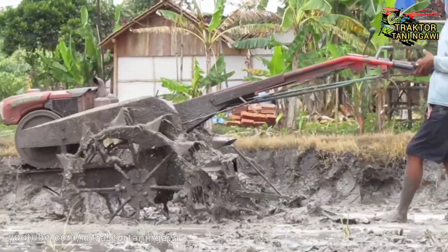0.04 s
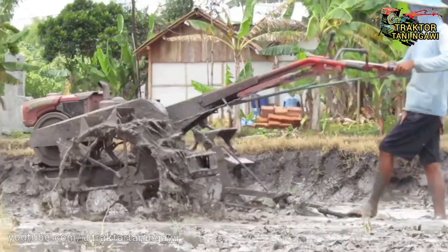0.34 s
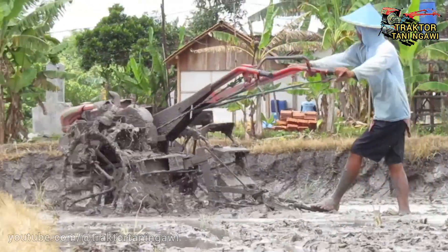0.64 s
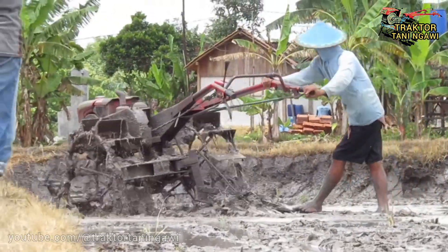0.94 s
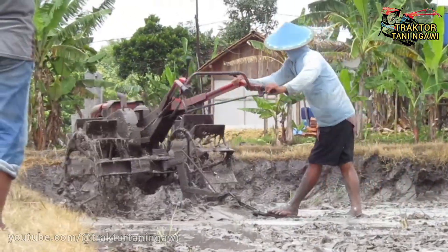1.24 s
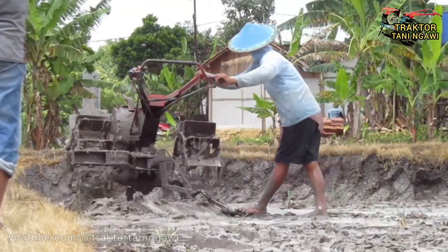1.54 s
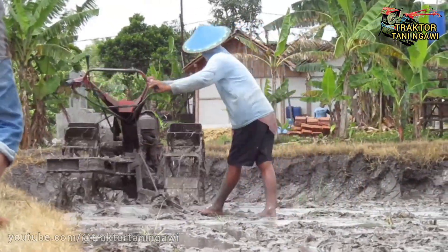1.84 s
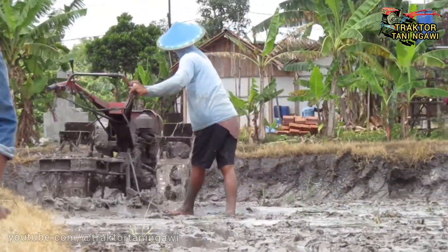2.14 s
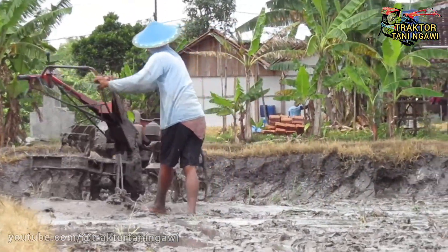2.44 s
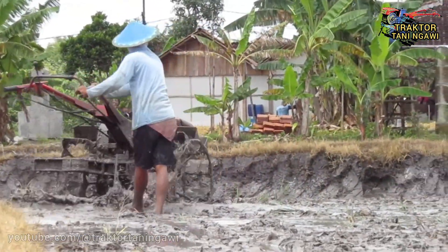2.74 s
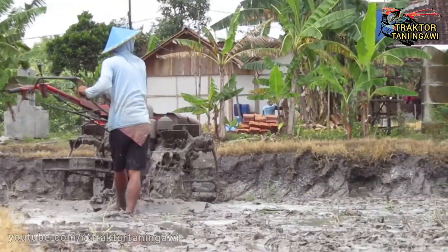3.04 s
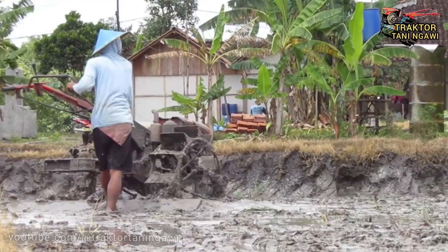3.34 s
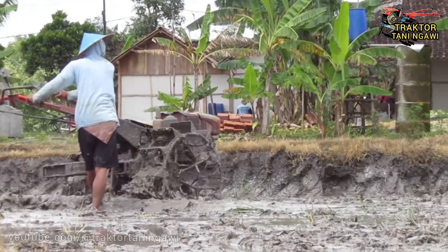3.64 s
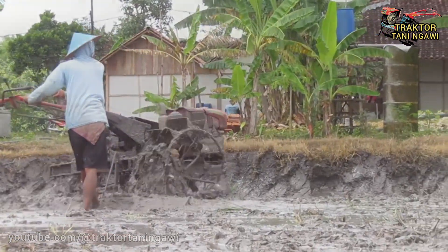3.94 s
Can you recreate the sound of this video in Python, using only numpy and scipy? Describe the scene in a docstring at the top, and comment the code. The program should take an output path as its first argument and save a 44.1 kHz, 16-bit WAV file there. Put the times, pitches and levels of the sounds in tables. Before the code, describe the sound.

A walking tractor's diesel engine chugs steadily, with faint mud splatter and wind.

```python
"""A single-cylinder diesel walking tractor turns round in a flooded field, a few metres from the mic.
Every cycle knocks in the block, spits from the exhaust and thumps in the pipes; the exhaust
swings away from the microphone and the bare engine comes round to face it.
Mud patters off the cage wheels, a loose part clanks and wind buffets the microphone."""
import sys
import numpy as np
from scipy import signal
from scipy.fft import rfft, irfft
from scipy.io import wavfile
from scipy.ndimage import uniform_filter1d

SR = 44100
rng = np.random.default_rng(int(sys.argv[2]) if len(sys.argv) > 2 else 0)


def waveform_to_disk(signal):
    """Save audio, clipped to [-1, 1], as 16-bit WAV at the path in sys.argv[1]."""
    frames = np.transpose(np.atleast_2d(signal))
    scaled = np.clip(frames, -1, 1) * 32767
    samples = np.round(scaled).astype(np.int16)
    wavfile.write(sys.argv[1], SR, samples)


N = 176400
TIME = np.arange(N) / SR
AGE = np.arange(SR // 5) / SR  # seconds since a firing


def undb(db):
    """Decibels to gain."""
    return 10 ** (np.asarray(db) / 20)


def curve(rows):
    """A table of (time, value) joined by straight lines."""
    return np.interp(TIME, *np.array(rows).T)


def unit(x):
    """Scale to rms 1."""
    return x / np.sqrt(np.mean(x ** 2) + 1e-18)


def colour(x, spectrum):
    """Causal filter through (Hz, dB) points; rms 1 out."""
    size = 2 * N
    hz, db = np.array(spectrum).T
    gain = undb(np.interp(np.log(np.fft.rfftfreq(size, 1 / SR) + 1), np.log(hz), db))
    cepstrum = irfft(np.log(gain))
    cepstrum[1:N] *= 2  # fold to minimum phase
    cepstrum[N + 1:] = 0
    return unit(irfft(rfft(x, size) * np.exp(rfft(cepstrum)))[:N])


def flicker(rate_hz):
    """Smooth random wandering with rms 1."""
    hold = max(int(SR / rate_hz), 1)
    steps = np.repeat(rng.standard_normal(N // hold + 1), hold)
    return unit(uniform_filter1d(steps, hold)[:N])


def burst(age, rise_s, decay_s):
    """Envelope: a straight rise, then an exponential fall."""
    return np.clip(age / rise_s, 0, 1) * np.exp(-np.maximum(age - rise_s, 0) / decay_s)


def ring(age, hz, decay_s):
    """A damped resonance struck at age 0."""
    age = np.maximum(age, 0)
    return -np.sin(2 * np.pi * hz * age) * np.exp(-age / decay_s)


def pings(times, pitches, levels_db, decay_s):
    """Many short rings, each with its own time, pitch and level."""
    age = np.arange(SR // 20) / SR
    out = np.zeros(N + len(age))
    for at, hz, db in np.broadcast(times, pitches, levels_db):
        if 0 <= at < N / SR:
            out[int(at * SR):][:len(age)] += undb(db) * ring(age, hz, decay_s)
    return out[:N]


def each_cycle(firings, shape, scatter_db, jitter_s):
    """Play a shape at every firing, a little uneven in strength and time."""
    timing, strength = rng.standard_normal((len(firings), 2)).T
    lead = SR // 10
    train = np.zeros(N + 2 * lead)
    at = ((firings + jitter_s * timing) * SR).astype(int) + lead
    train[np.clip(at, 0, len(train) - 1)] = undb(scatter_db * strength)
    return signal.fftconvolve(train, shape)[lead:lead + N]


# engine speed (time [s], firing rate [Hz])
ENGINE_SPEED = [(0.0, 14.977), (0.4, 15.213), (0.9, 15.246), (1.35, 15.176), (1.6, 15.425), (1.9, 15.663),
                (2.15, 15.439), (2.5, 15.537), (3.0, 15.17), (3.35, 15.334), (3.6, 15.425), (3.8, 15.1)]

def firing_times(first_s=-0.0025):
    """The cylinder fires once a cycle, and is already running at the start."""
    cycles = np.cumsum(curve(ENGINE_SPEED)) / SR
    firings = first_s + np.interp(np.arange(int(cycles[-1]) + 1), cycles, TIME)
    return np.r_[2 * firings[0] - firings[1], firings]


def rattle(firings, repeat):
    """Dense vibration; the share `repeat` recurs each cycle, in a pattern that shifts with the turn."""
    last_firing = firings[np.searchsorted(firings, TIME, "right") - 1]
    samples_since = ((TIME - last_firing) * SR).astype(int)
    patterns = rng.standard_normal((6, SR // 10))
    facing = TIME / TIME[-1] * (len(patterns) - 1)
    recurring = sum(pattern[samples_since % len(pattern)] * np.cos(np.pi / 2 * np.clip(facing - k, -1, 1))
                    for k, pattern in enumerate(patterns))
    return np.sqrt(repeat) * recurring + np.sqrt(1 - repeat) * rng.standard_normal(N)


# modes of the engine's metal parts (frequency [Hz], decay [s], gain [dB])
METAL_MODES = [(841, 0.0055, -4.5), (1252, 0.033, -1), (1930, 0.069, -15), (2842, 0.0042, 4),
               (4380, 0.0047, 3), (5650, 0.008, 7), (6800, 0.0024, 3)]

def metal(vibration):
    """Vibration together with the ringing that it starts in the metal; rms 1 out."""
    age = np.arange(SR // 8) / SR
    modes = sum(undb(db) * 2 / (decay * SR) * np.cos(2 * np.pi * hz * age) * np.exp(-age / decay)
                for hz, decay, db in METAL_MODES)
    return unit(vibration + signal.fftconvolve(vibration, modes)[:N])


# tone of the block (frequency [Hz], relative level [dB])
BLOCK_SPECTRUM = [(400, -12.5), (700, -15), (900, 1), (1050, 0), (1450, 0.5), (1750, -8), (2050, -21.5),
                  (5000, -61)]
# hard combustion knock, heard as the cylinder comes round to the mic (time [s], level [dB])
COMBUSTION_LEVEL = [(0, -37), (2.2, -41.5), (2.85, -35.5), (3.4, -32.5), (4, -34)]
# blows on the block (time after firing [s], rise [s], decay [s], relative level [dB])
BLOCK_BLOWS = [(.0015, 0.0013, 0.0085, 1.5), (0.0132, 0.0026, 0.0028, -5), (0.02, 0.0026, 0.0099, -9.5)]
# their rattling knock at the mic (time [s], level [dB])
KNOCK_LEVEL = [(.25, -25.5), (.55, -31), (1.2, -33.5), (2.4, -33), (3.4, -31.5), (4, -26.5)]

def block_knock(firings):
    """Combustion and valve gear knock on the block."""
    bang = each_cycle(firings, burst(AGE - 0.0023, 0.0015, 0.0039), scatter_db=1.5, jitter_s=0.00031)
    combustion = colour(rattle(firings, repeat=1) * bang, BLOCK_SPECTRUM)
    shapes = [undb(db) * burst(AGE - at, rise, decay) for at, rise, decay, db in BLOCK_BLOWS]
    blows = sum(each_cycle(firings, shape, scatter_db=1.3, jitter_s=0.0014) for shape in shapes)
    knock = colour(rattle(firings, repeat=0.41) * (blows + undb(-12.5)), BLOCK_SPECTRUM)
    return combustion * undb(curve(COMBUSTION_LEVEL)) + metal(knock) * undb(curve(KNOCK_LEVEL))


# tone of the covers (frequency [Hz], relative level [dB])
CLATTER_SPECTRUM = [(1000, -8), (1800, 6), (2850, 0.5), (3300, 1), (5200, -16), (6800, -12), (12000, -23.5),
                    (15000, -53)]
# their clatter at the mic, faintest in mid-turn (time [s], level [dB])
CLATTER_LEVEL = [(.2, -29), (.45, -34), (.6, -51.5), (1.45, -56.5), (1.9, -51.5), (2.65, -43), (3.4, -40.5),
                 (3.8, -35)]

def cover_clatter(firings):
    """Each firing sets the block's covers clattering brightly; they never quite settle."""
    jolts = each_cycle(firings, burst(AGE - 0.001, 0.004, 0.013), scatter_db=2, jitter_s=0.0011)
    shaking = rattle(firings, repeat=0.064) * (jolts + undb(-10.5)) * undb(2.06 * flicker(700))
    return metal(colour(shaking, CLATTER_SPECTRUM)) * undb(curve(CLATTER_LEVEL))


# tone of the rumble (frequency [Hz], relative level [dB])
RUMBLE_SPECTRUM = [(25, -21.5), (55, -1.5), (90, -4.5), (320, -4.5), (450, -11), (1200, -21.5),
                   (9000, -98.5)]
# rumble at the mic (time [s], level [dB])
RUMBLE_LEVEL = [(0, -25.5), (1.15, -25), (2.7, -27), (3.5, -26)]

def rumble(firings):
    """An unbroken low vibration under the engine's beat."""
    return colour(rattle(firings, repeat=0.45), RUMBLE_SPECTRUM) * undb(curve(RUMBLE_LEVEL))


def droplets(count, low_hz=3490, high_hz=8100):
    """Drops fall from the wheels, many faint and a few distinct."""
    when, pitch, size = rng.random((count, 3)).T
    levels_db = -4.5 + 10 * size ** 2 - 6 * pitch
    return pings(when * N / SR, low_hz * (high_hz / low_hz) ** pitch, levels_db, decay_s=0.003)


# tone of the wet patter (frequency [Hz], relative level [dB])
MUD_SPECTRUM = [(1000, 9), (2500, 0.5), (4400, 0.5), (7000, -3), (12200, -5.5), (15000, -22)]
# wet hiss of mud and wheels, a few metres off (time [s], level [dB])
MUD_LEVEL = [(0, -41.5), (.25, -39.5), (.55, -50), (1.55, -48.5), (1.9, -42.5), (2.35, -44.5), (2.6, -39),
             (2.9, -41.5), (4, -43.5)]
# clods landing in the flooded field (time [s], decay [s], level [dB])
CLOD_SPLASHES = [(2.287, 0.0037, -31), (2.502, 0.0046, -31), (2.578, 0.0052, -25.5), (3.586, 0.0036, -29)]

def mud():
    """Fine patter and droplets off the cage wheels, and a few clods landing in water."""
    patter = colour(rng.standard_normal(N) * undb(1.8 * flicker(500) + 1.17 * flicker(35)), MUD_SPECTRUM)
    clods = sum(undb(db) * burst(TIME - at, 0.0017, decay) for at, decay, db in CLOD_SPLASHES)
    return (patter + droplets(count=420)) * undb(curve(MUD_LEVEL)) + patter * clods


# exhaust thump, falling as the pipe swings off the mic (time [s], level [dB])
THUMP_LEVEL = [(0, -10.5), (1.1, -10), (2.0, -13.5), (3.0, -18), (4, -18.5)]
# tone of the spit (frequency [Hz], relative level [dB])
SPIT_SPECTRUM = [(1200, 1), (2400, -22), (2850, -3.5), (3300, -0.5), (4200, 8.5), (5100, -3.5), (5850, -1),
                 (7700, -5), (12000, -8), (15000, -17)]
# spit, loudest while the pipe faces the mic (time [s], level [dB])
SPIT_LEVEL = [(.08, -33), (.415, -37.5), (.48, -46.5), (1.25, -48), (1.55, -52), (2.3, -52), (4, -46)]
# tone of the jet's high sizzle (frequency [Hz], relative level [dB])
SIZZLE_SPECTRUM = [(5000, -26), (10000, 2), (12600, -1.5), (15000, -14)]
# sizzle at the mic (time [s], level [dB])
SIZZLE_LEVEL = [(0, -54), (.45, -48), (1.3, -49.5), (1.8, -61)]

def exhaust(firings, valve_opens_s=0.0158):
    """The valve opens: a low thump, and a sizzling jet of gas that rings the silencer."""
    age = AGE - valve_opens_s
    thump = each_cycle(firings, ring(age, hz=121.4, decay_s=0.0073), scatter_db=2.9, jitter_s=0.0001)
    puff = burst(age, 0.0024, 0.0032) + undb(-20) * burst(age, 0.0052, 0.017)
    jet = each_cycle(firings, puff, scatter_db=1, jitter_s=0.00023)
    spit = metal(colour(rattle(firings, repeat=0.085) * jet, SPIT_SPECTRUM))
    spit += silencer_clinks(firings + valve_opens_s)
    sizzle = colour(rng.standard_normal(N) * (jet + undb(-17.5)), SIZZLE_SPECTRUM)
    return (thump * undb(curve(THUMP_LEVEL)) + spit * undb(curve(SPIT_LEVEL))
            + sizzle * undb(curve(SIZZLE_LEVEL)))


def silencer_clinks(puffs, low_hz=3990, high_hz=7320, spread_s=0.0034, over_spit_db=11.5):
    """Each puff jolts the silencer into a pair of clinks, never at quite the same pitches."""
    late, pitch = rng.random((2 * len(puffs), 2)).T
    times = np.repeat(puffs, 2) + spread_s * late
    return pings(times, low_hz * (high_hz / low_hz) ** pitch, over_spit_db, decay_s=0.0029)


# rings left by gas pulses (time after firing [s], frequency [Hz], decay [s], level [dB])
GAS_PULSES = [(.0349, 285, 0.0051, -9), (0.0352, 910, 0.0054, -26.5), (0.052, 166, 0.033, -19.5),
              (0.0528, 312, 0.024, -20.5), (0.01607, 226, 0.058, -30.5)]
# how they carry to the mic as the machine turns (time [s], gain [dB])
PULSE_GAIN = [(2.3, -2.5), (2.9, -0.5), (3.3, -1.5), (4, 1.5)]
# tone of the hollow pop (frequency [Hz], relative level [dB])
POP_SPECTRUM = [(250, -21), (400, -16), (520, 0.5), (720, -1.5), (900, 7), (1500, -25.5), (12000, -85)]
# pop at the mic (time [s], level [dB])
POP_LEVEL = [(1.2, -32.5), (1.7, -46), (2.4, -38.5), (3.0, -36.5), (4, -31.5)]

def pipes(firings, pop_s=0.0342):
    """Gas pulses ring the pipes, with one hollow pop in each cycle."""
    shapes = [undb(db) * ring(AGE - at, hz, decay) for at, hz, decay, db in GAS_PULSES]
    rings = sum(each_cycle(firings, shape, scatter_db=1.38, jitter_s=0.0001) for shape in shapes)
    vibration = rattle(firings, repeat=0.97)
    bursts = each_cycle(firings, burst(AGE - pop_s, 0.00056, 0.0034), scatter_db=0.4, jitter_s=0.0001)
    pop = metal(colour(vibration * bursts, POP_SPECTRUM))
    return rings * undb(curve(PULSE_GAIN)) + pop * undb(curve(POP_LEVEL))


# tone of the valve's tick (frequency [Hz], relative level [dB])
TICK_SPECTRUM = [(1500, -10), (4100, -4), (6800, 2), (10000, -18)]
# tick at the mic (time [s], level [dB])
TICK_LEVEL = [(0, -56), (.6, -76), (2.3, -65), (2.9, -55)]

def valve_ticks(firings, seats_s=0.034):
    """A valve seats with a small tick in every cycle."""
    seating = each_cycle(firings, burst(AGE - seats_s, 0.0012, 0.0054), scatter_db=2.5, jitter_s=0.00055)
    return colour(rng.standard_normal(N) * seating, TICK_SPECTRUM) * undb(curve(TICK_LEVEL))


# strikes of a loose metal part (time [s], level [dB])
LOOSE_STRIKES = [(0.0787, -19.5), (0.281, -18), (.412, -12), (3.8021, -18.5), (3.8696, -24), (3.9352, -26)]
# its modes (frequency [Hz], decay [s], gain [dB])
LOOSE_MODES = [(2858, 0.0031, 1.5), (4240, 0.0038, -13)]

def loose_part():
    """Now and then a loose part clanks as the engine shakes."""
    times, strike_db = np.array(LOOSE_STRIKES).T
    return sum(pings(times, hz, strike_db + mode_db, decay) for hz, decay, mode_db in LOOSE_MODES)


# gusts right on the microphone (time [s], length [s], level [dB])
MIC_GUSTS = [(0.244, 0.32, -22.5), (1.246, 0.035, -13), (1.3, 0.038, -13), (1.353, 0.07, -16),
             (1.396, 0.018, -12.5), (1.444, 0.082, -13), (1.523, 0.058, -12.5), (1.765, 0.084, -17.5),
             (1.898, 0.045, -15), (2.028, 0.21, -20), (2.599, 0.31, -23)]
# tone of their rumble (frequency [Hz], relative level [dB])
WIND_SPECTRUM = [(20, -30), (105, 2), (220, 0.5), (320, -6), (450, -9.5), (1500, -70)]
# single thuds of wind (time [s], frequency [Hz], decay [s], level [dB])
MIC_THUDS = [(1.284, 554, 0.0029, -9), (1.293, 149.6, 0.0058, -10), (1.507, 225, 0.011, -3.5),
             (1.743, 260, 0.0029, 2.5), (2.011, 218, 0.0026, 6), (2.094, 273, 0.0023, 7.5),
             (2.094, 517, 0.0051, -3.5), (2.123, 202, 0.0055, -6)]

def wind():
    """Short gusts rumble and thud on the microphone."""
    power = sum(undb(db) ** 2 * np.exp(-8 * ((TIME - at) / length) ** 2) for at, length, db in MIC_GUSTS)
    thuds = sum(undb(db) * ring(TIME - at, hz, decay) * np.clip((TIME - at) / 0.0021, 0, 1)
                for at, hz, decay, db in MIC_THUDS)
    return np.sqrt(power) * colour(rng.standard_normal(N), WIND_SPECTRUM) + thuds


def scene():
    """Engine, mud and wind at one microphone in the field."""
    firings = firing_times()
    engine = (block_knock(firings) + cover_clatter(firings) + exhaust(firings) + pipes(firings)
              + rumble(firings) + valve_ticks(firings) + loose_part())
    dip = undb(-6 * np.exp(-((TIME - 0.373) / 0.034) ** 2))  # the engine's level dips briefly
    return (engine * dip + mud() + wind())[None]


def record(dry, low_cut_hz=58, notch_hz=7880, top_hz=15000):
    """The recorder thins the deep bass, has a narrow notch in the treble and cuts the top."""
    thinned = signal.sosfilt(signal.butter(2, low_cut_hz, "high", fs=SR, output="sos"), dry)
    notched = signal.lfilter(*signal.iirnotch(notch_hz, Q=45, fs=SR), thinned)
    return signal.sosfilt(signal.ellip(10, 0.2, 80, top_hz, fs=SR, output="sos"), notched)


dry = scene()
out = record(dry)
waveform_to_disk(out)
```